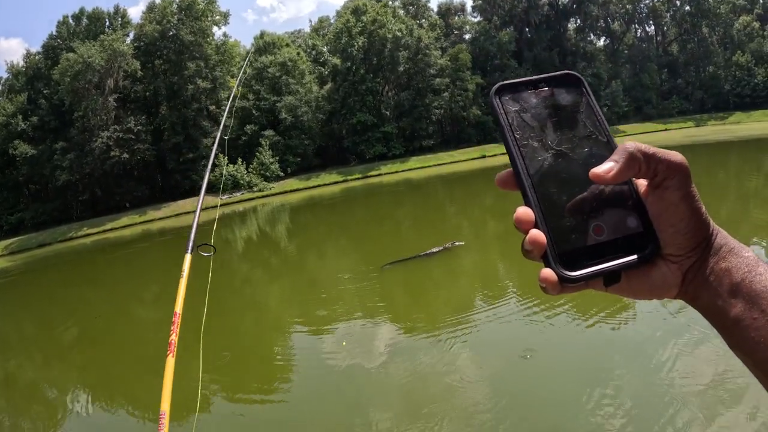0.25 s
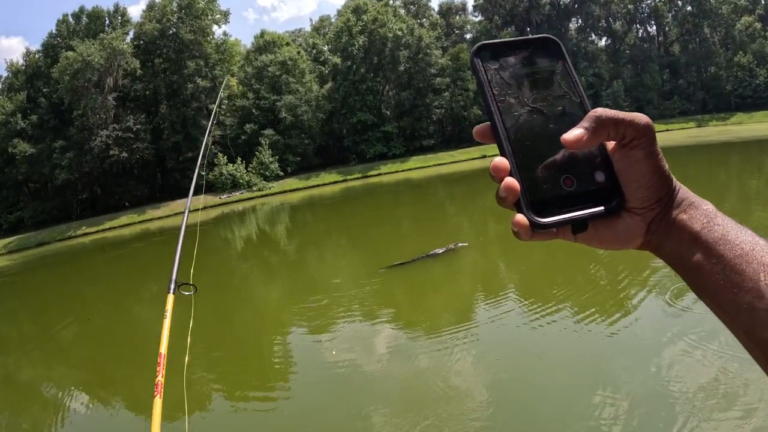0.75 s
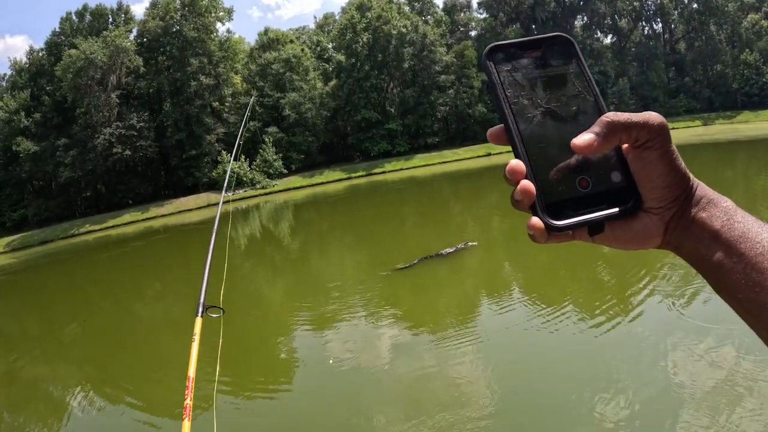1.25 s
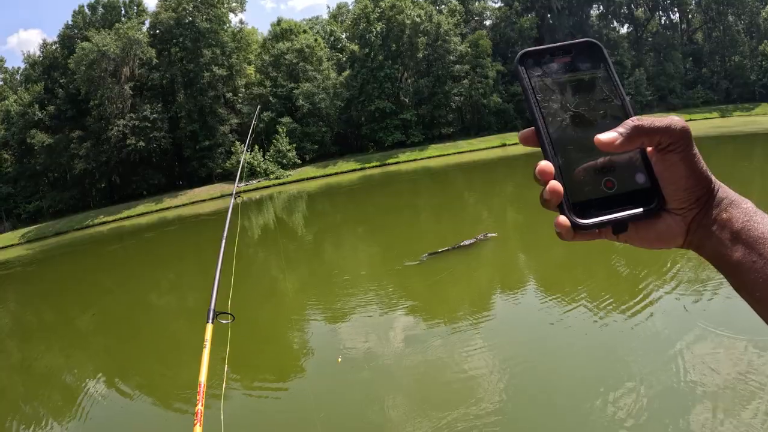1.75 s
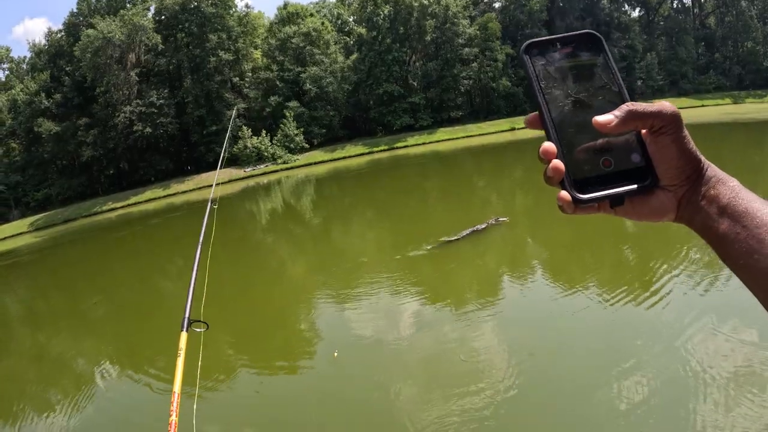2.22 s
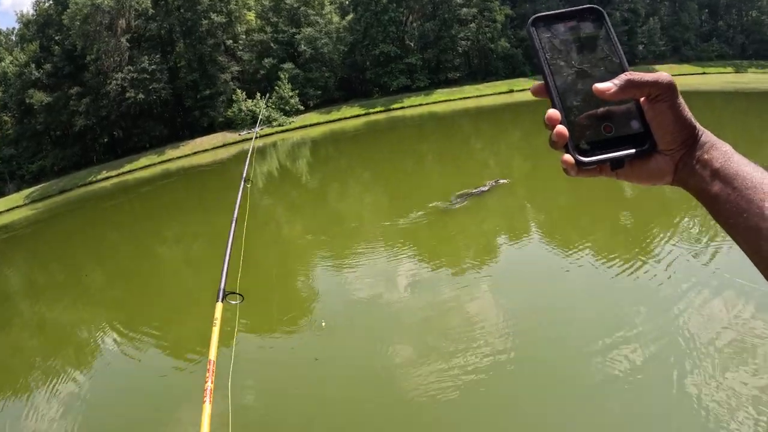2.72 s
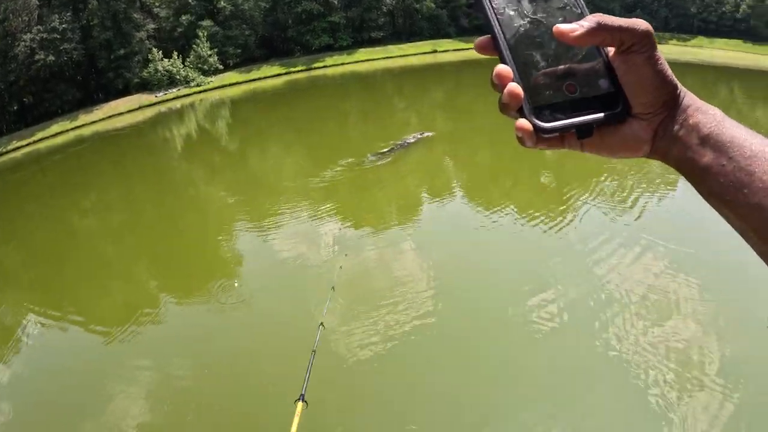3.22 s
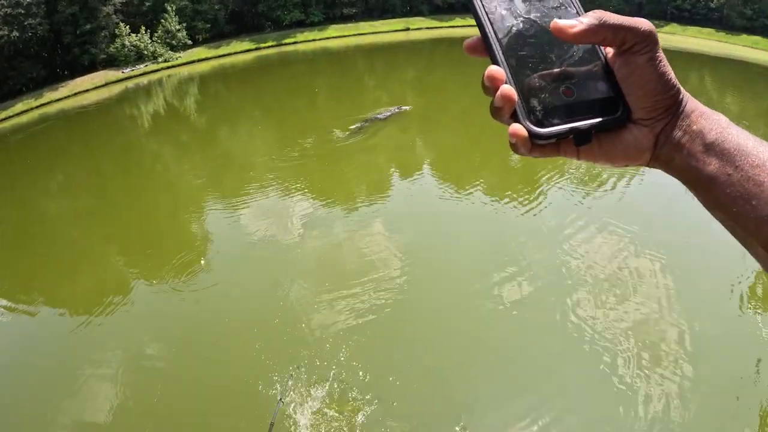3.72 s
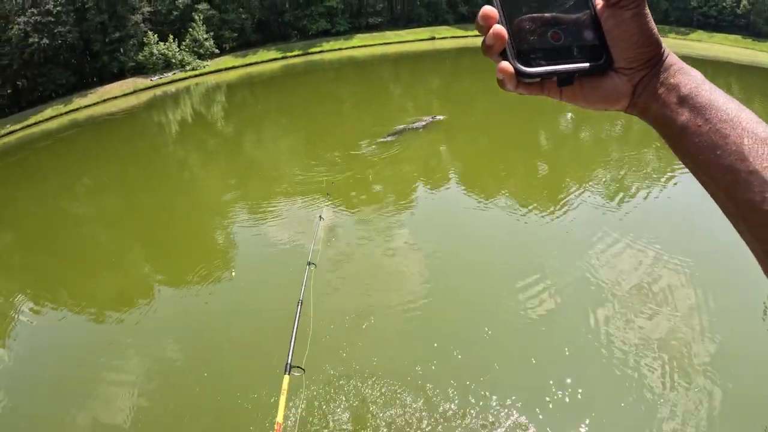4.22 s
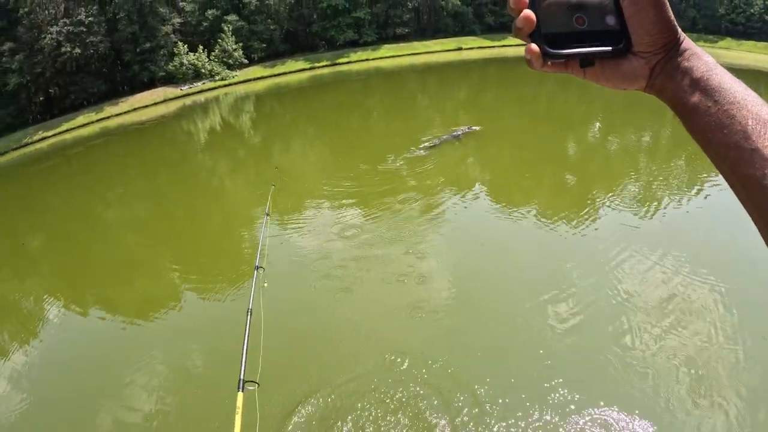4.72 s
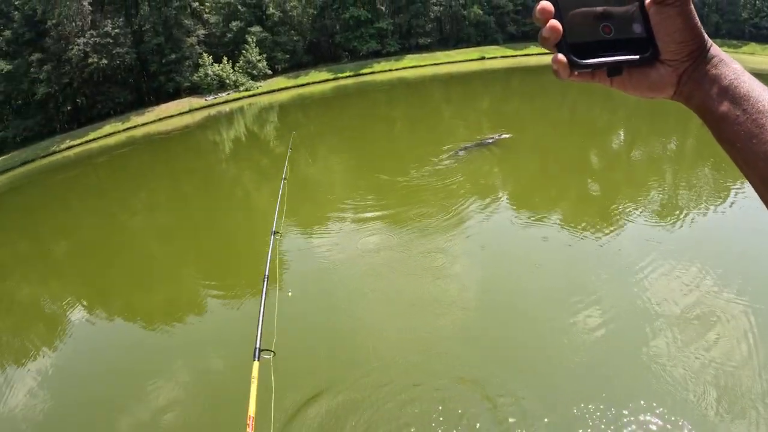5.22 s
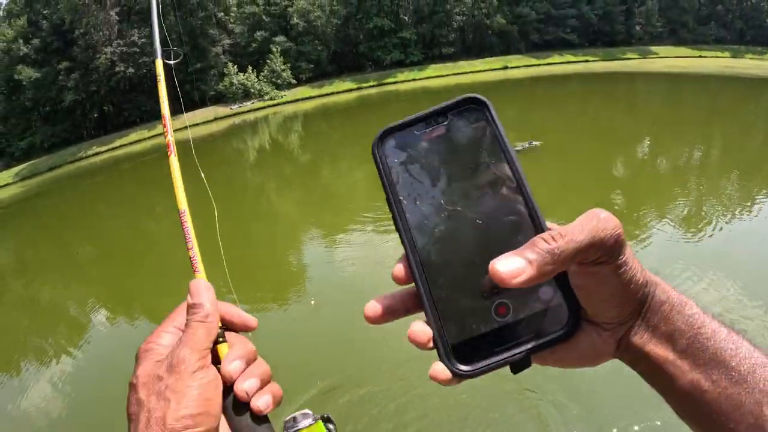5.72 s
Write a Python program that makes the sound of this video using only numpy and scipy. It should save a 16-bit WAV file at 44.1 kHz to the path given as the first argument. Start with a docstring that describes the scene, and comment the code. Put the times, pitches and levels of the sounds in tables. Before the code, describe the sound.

A roughly six-second outdoor scene at a still pond. A soft, steady low rumble, faint distant rush and wide leafy hiss run throughout. From about 0.95 to 1.3 s, a person close to the microphone makes a few wet, unvoiced smacks, the last one sharpest. After a gap, a stronger series follows at about 2.0, 2.2, 2.35, 2.5, 2.65 and 2.95 s: tiny sticky crackles, bright snaps and short hollow pops that drop in pitch. At 3.48 s a rod tip slaps the water, with a low plop and bright bubbles; a second stroke follows around 3.75 s, with fizzing spray and gurgling. Drops tick and patter until about 4.5 s, thinning into fading fizz. The end is quiet, with a faint wavering motor hum strongest near 5.2 s and barely audible thin insect tones. Reflections are short and slight.

```python
"""Pond bank: wet smacks and a splash

On the bank of a still pond someone makes wet, unvoiced smacking clicks close to the microphone, as if to
lure an animal: noisy ruptures ring in a slit and in a growing cavity. Then a rod tip and its line thrash
the water: filtered noise slaps, gliding sine bubbles, and grains of spray that patter back.
Coloured noise makes the low rumble, a distant rush and the hiss of trees; wavering sines make a faint
motor hum, and narrow noise bands make far insects."""
import sys
import numpy as np
from scipy import signal
from scipy.fft import rfft, irfft
from scipy.io import wavfile
from scipy.ndimage import uniform_filter1d

SR = 44100
rng = np.random.default_rng(int(sys.argv[2]) if len(sys.argv) > 2 else 0)


def dump_mix(stems):
    """Bounce the given channels to the path in sys.argv[1] as a 16-bit WAV at rate SR."""
    frames = np.atleast_2d(stems).T  # one column per channel
    limited = np.clip(frames, -1, 1)  # hard clip at full scale
    pcm = np.round(limited * 32767).astype(np.int16)
    wavfile.write(sys.argv[1], SR, pcm)


N = 262944
TIME = np.arange(N) / SR
CUTOFF_HZ = 16400   # top of the audible band here


def from_db(db):
    """Decibels to gain."""
    return 10 ** (np.asarray(db) / 20)


def rms_one(x):
    """Scale to unit power."""
    return x / np.sqrt(np.mean(x ** 2) + 1e-20)


def gains(rows):
    """Each dB column of a time curve as a gain per sample."""
    s, *columns = np.transpose(rows)
    return [from_db(np.interp(TIME, s, column)) for column in columns]


def at_hz(points, hz):
    """Read a table along log frequency."""
    f, value = np.transpose(points)
    return np.interp(np.log(hz + 1e-3), np.log(f), value)


def add(track, s, sound):
    """Mix a short sound in at time s."""
    i = int(s * SR)
    track[i:i + len(sound)] += sound[:N - i]


def decay(t, t60):
    """Exponential fall of 60 dB in t60 seconds."""
    return np.exp(-np.log(1000) * t / t60)


def drift(rate, size=N):
    """Slow random wander around 0: normal knots, rate per second, joined by straight lines."""
    knots = rng.standard_normal(400)
    return np.interp(TIME[:size] * rate, np.arange(len(knots)), knots)


def coloured(x, spectrum, keep_power=True, size=8192):
    """Causal minimum-phase filter with the given spectrum, made by folding its cepstrum."""
    hz = np.arange(size // 2 + 1) * SR / size
    cepstrum = irfft(np.log(from_db(at_hz(spectrum, hz))))
    cepstrum[1:size // 2] *= 2
    cepstrum[size // 2 + 1:] = 0
    response = irfft(np.exp(rfft(cepstrum)))
    if keep_power:
        response = response / np.linalg.norm(response)
    return signal.fftconvolve(x, response)[:N]


def placed(pair, balance):
    """Shade left against right, band by band."""
    shaded = []
    for x, sign in zip(pair, (1, -1)):
        half_balance = [(hz, sign * db / 2) for hz, db in balance]
        shaded.append(coloured(x, half_balance, keep_power=False))
    return np.array(shaded)


def ping(hz, t60, octaves, onset_cycles, wobble=0):
    """A dying sine that glides as it rings; a bubble's pitch also wobbles as it changes shape."""
    t = np.arange(int(t60 * SR) + 2) / SR
    shape = np.interp(t * hz / 2, np.arange(64), rng.standard_normal(64))
    pitch = np.minimum(hz * 2 ** (octaves * t / t60 + wobble * shape), SR / 2)
    onset = 1 - np.exp(-t * hz / onset_cycles)
    return np.sin(2 * np.pi * np.cumsum(pitch) / SR) * from_db(-60 * t / t60) * onset


def grains(per_s, spread_db, size=N):
    """Random clicks of uneven strength and either polarity; unit power."""
    strength_db = spread_db * np.minimum(rng.exponential(1, size), 4)
    strength = from_db(strength_db) * rng.choice([-1, 1], size)
    return rms_one(strength * (rng.random(size) < per_s / SR))


# colour of the low rumble: pitch_hz, relative_db (per Hz)
RUMBLE_COLOUR = [(12, -12.5), (40, 2), (90, 0), (120, -4.5), (200, -7.5), (280, -14), (400, -25),
                 (1500, -64.5)]
# colour of the tree hiss: pitch_hz, relative_db (per Hz)
HISS_COLOUR = [(250, -8.5), (550, 4), (850, -7), (1150, 2), (1550, 6), (2200, -2.5), (3600, -1.5),
               (7400, -8.5), (8400, -22), (10300, -22.5), (13500, -45.5)]
# how alike the hiss is in left and right: pitch_hz, likeness (0 to 1)
HISS_LIKENESS = [(130, 0.1), (640, 0.43), (6800, 0.55)]
# loudness of the distant low rush: time_s, level_db
RUSH_LEVEL = [(0, -54), (1, -53), (1.6, -57), (4.8, -61)]
# colour of the rush: pitch_hz, relative_db (per Hz)
RUSH_TONE = [(150, -14), (280, 9.5), (600, 2), (800, -2), (1050, 2), (2000, -55.5)]
# stereo lean of the air, and of the smacks too: pitch_hz, left_minus_right_db
NEAR_BALANCE = [(250, 2.5), (700, 2.5), (1400, 7.5), (4400, 1), (8120, 1.5), (15000, 10)]


def outdoors(rumble_db=-43, rumble_width_db=-27.5, leaves_db=-53.5):
    """Coloured noise: rumble nearly common to both ears, a distant rush, and the wide hiss of the trees."""
    white = rng.standard_normal((5, N))
    rumble_mid, rumble_side = [coloured(w, RUMBLE_COLOUR) for w in white[:2]]
    rumble = from_db(rumble_db) * (rumble_mid + from_db(rumble_width_db) * rumble_side * [[1], [-1]])
    alike = np.clip(at_hz(HISS_LIKENESS, np.arange(N // 2 + 1) * SR / N), -1, 1)
    parts = []
    for w, sign in zip(white[2:4], (1, -1)):
        share = np.sqrt((1 + sign * alike) / 2)   # shared and opposed power add up to one
        parts.append(irfft(rfft(coloured(w, HISS_COLOUR)) * share, N))
    mid, side = parts
    hiss = from_db(leaves_db) * (mid + side * [[1], [-1]])
    rush = gains(RUSH_LEVEL)[0] * coloured(white[4], RUSH_TONE)
    return rumble + placed(hiss + rush, NEAR_BALANCE)


# loudness of the two motor lines before flutter: time_s, low_line_db, high_line_db
HUM_LEVELS = [(0, -56.5, -57), (3.6, -52.5, -56.5), (4.6, -50.5, -50.5), (5.2, -45, -50.5),
              (5.96, -52.5, -56.5)]


def motor(low_hz=99, high_hz=178, flutter_db=3.0, wander=.05):
    """Two lines of a far engine, wavering in pitch and level."""
    hum = np.zeros(N)
    for gain, hz in zip(gains(HUM_LEVELS), (low_hz, high_hz)):
        level = np.sqrt(2) * gain * from_db(flutter_db * drift(9))
        pitch = hz * (1 + wander * drift(12))
        hum += level * np.sin(2 * np.pi * np.cumsum(pitch) / SR)
    return hum


# insect choruses in the trees: middle_s, length_s, pitch_hz, level_db
CHORUSES = [(2.4, 2.0, 3480, -69), (5.2, 2.2, 4310, -71), (5.4, 2.2, 5510, -70)]


def insects(sharpness=45):
    """Far choruses swell and fade, each a narrow resonance fed with noise."""
    chorus = np.zeros(N)
    for s, length, hz, db in CHORUSES:
        rise_and_fade = np.exp(-(2 * (TIME - s) / length) ** 4)
        rasp = signal.lfilter(*signal.iirpeak(hz, sharpness, fs=SR), rng.standard_normal(N))
        chorus += from_db(db) * rise_and_fade * rms_one(rasp)
    return chorus


def bank(x, echo_db, t60):
    """Ground and grass scatter a short, faint tail of decaying noise, different on each side."""
    t = np.arange(8192) / SR
    tail = rng.standard_normal((2, len(t))) * decay(t, t60) * (t > .004)
    tail /= np.linalg.norm(tail, axis=1, keepdims=True)
    return x + from_db(echo_db) * signal.fftconvolve(x, tail, axes=1)[:, :N]


POP_CYCLES = 4.36   # cycles in which a pop or plop falls by 60 dB
HOLLOW_START_HZ, HOLLOW_T60_S = 1190, .0042   # every smack opens from the same small cavity
HOLLOW_SWELL = .6   # power of the opening that raises the hollow ring
PEEL_ATTACK_S, PEEL_TAIL_S = .0006, .003
# wet seals peeling open: start_s, length_s, crackle_db, hollow_db, hollow_end_hz, slit_hz
SMACK_EVENTS = [(0.94, 0.015, -77, -41, 510, 7000), (0.956, 0.035, -39, -67, 594, 7300),
                (1.129, 0.031, -49.5, -50.5, 910, 5000), (1.29, 0.037, -35.5, -49, 1070, 6300),
                (2.027, 0.018, -39.5, -34.5, 970, 8660), (2.186, 0.026, -34, -32, 470, 8140),
                (2.339, 0.01, -30.5, -41.5, 600, 6030), (2.507, 0.027, -47.5, -67, 800, 4560),
                (2.642, 0.028, -36, -39, 510, 4770), (2.938, 0.026, -36, -41, 680, 5140)]
# the sharpest snaps of the seal: start_s, level_db
SEAL_SNAPS = [(0.9605, -21), (0.964, -20.5), (0.967, -23), (0.9875, -24), (1.297, -16), (1.3003, -16),
              (1.3064, -8.5), (1.3136, -9.5), (2.0307, -20), (2.198, -15), (2.207, -18), (2.3389, -12),
              (2.3415, -10), (2.6399, -18.5), (2.6446, -12), (2.6598, -22), (2.946, -14), (2.957, -8)]
# hollow pops as the tongue lets go: start_s, level_db, pitch_hz
TONGUE_POPS = [(1.076, -30.5, 486), (2.031, -12.5, 1110), (2.154, -25.5, 560), (2.2091, -14.5, 446),
               (2.348, -19, 564), (2.666, -15.5, 586), (2.957, -22, 587)]
# colour of the crackle: pitch_hz, relative_db (per Hz)
CRACKLE_COLOUR = [(120, -1), (500, 8), (1700, 11), (2450, 4.5), (3500, 8.5), (4700, 6.5), (6700, 8),
                  (8600, 0.5), (10200, 3.5), (13000, -25), (16000, -35)]


def smacks(snap_edge_db=-3, slit_q=3, slit_db=3, tightness=0.38, clump_db=1.5, mic_dip_hz=2500):
    """A seal peels in tiny ruptures that ring in the slit and a growing, sinking cavity; snaps and pops join."""
    crackle, rings = np.zeros(N), np.zeros(N)
    t = np.arange(4096) / SR
    for s, length, crackle_db, hollow_db, end_hz, slit_hz in SMACK_EVENTS:
        peel = (1 - np.exp(-t / PEEL_ATTACK_S)) * np.exp(-np.maximum(t - length, 0) / PEEL_TAIL_S)
        opening = np.minimum(t / length, 1)
        ruptures = grains(9000, 3.5, size=len(t)) * from_db(clump_db * drift(300, size=len(t)))
        # a tight seal rings in the slit rather than in the cavity
        slit = from_db(slit_db + tightness * (crackle_db - hollow_db))
        slit_ring = signal.lfilter(*signal.iirpeak(slit_hz, slit_q, fs=SR), ruptures)
        bright = rms_one(ruptures + slit * slit_ring)
        thinning = 1 - .5 * opening ** 2   # the crackle thins as the gap widens
        add(crackle, s, from_db(crackle_db) * peel * thinning * bright)
        # a gliding resonance: unwind the pitch, smooth, wind it back
        cavity_hz = HOLLOW_START_HZ * (end_hz / HOLLOW_START_HZ) ** opening
        turn = np.exp(2j * np.pi * np.cumsum(cavity_hz) / SR)
        keep = decay(1 / SR, HOLLOW_T60_S)
        cavity_ring = np.real(turn * signal.lfilter([1], [1, -keep], ruptures / turn))
        hollow = cavity_ring * peel * opening ** HOLLOW_SWELL
        hollow_rms = np.sqrt(np.sum(hollow ** 2) / (length * SR))
        add(rings, s, from_db(hollow_db) * hollow / hollow_rms)
    for s, db in SEAL_SNAPS:
        # a snap rings at or below the slit pitch of the nearest smack
        slit_hz = min(SMACK_EVENTS, key=lambda row: abs(row[0] - s))[-1]
        add(rings, s, from_db(db) * ping(slit_hz * rng.uniform(0.78, 1), .003, 0, 0.079))
        add(crackle, s, from_db([db + snap_edge_db]))   # a one-sample edge
    for s, db, hz in TONGUE_POPS:
        # each pop sinks about an octave as the cavity grows
        add(rings, s, from_db(db) * ping(hz, POP_CYCLES / hz, -1.05, 0.14))
    # a dip in the microphone's response near 2.5 kHz
    rings = signal.lfilter(*signal.iirnotch(mic_dip_hz, 2, fs=SR), rings)
    ring_band = signal.butter(2, [190, 11000], "band", fs=SR, output="sos")
    sound = coloured(crackle, CRACKLE_COLOUR) + signal.sosfilt(ring_band, rings)
    return placed([sound, sound], NEAR_BALANCE)


def swell(since, attack_s, hold_s, fade_db_per_s):
    """Attack, then a steady dB fade once hold_s has passed since the event."""
    return np.clip(since / attack_s, 0, 1) * from_db(-fade_db_per_s * np.maximum(since - hold_s, 0))


SPRAY_ATTACK_S, SPRAY_HOLD_S, SPRAY_FADE_DB_PER_S = 0.0058, 0.052, 69
FOAM_DB, FOAM_FADE_DB_PER_S = -9.5, 19   # foam fizzes on, below the spray
# the trough closes this long after the stroke
COLLAPSE_S, CHURN_ATTACK_S, CHURN_FADE_DB_PER_S = 0.04, 0.015, 216
# thrown drops come down again and stir the surface a little
FLIGHT_S, FLIGHT_SPREAD_S, FALL_CHURN_DB = 0.28, 0.2, -10.5
# strokes of the rod through the water, levels before the layer mix:
# start_s, spray_db, churn_db, falling_drops_db, churn_hold_s
ROD_STROKES = [(3.481, -39, -33, -55, 0.022), (3.753, -38, -40.5, -42, 0.075)]


def stirred_water():
    """Spray and churn strength: strokes throw spray, troughs collapse, drops fall back and foam lingers."""
    spray, churn = [], []
    for s, spray_db, churn_db, fall_db, hold_s in ROD_STROKES:
        since = TIME - s
        thrown = from_db(spray_db) * swell(since, SPRAY_ATTACK_S, SPRAY_HOLD_S, SPRAY_FADE_DB_PER_S)
        foam = from_db(spray_db + FOAM_DB) * swell(since, SPRAY_ATTACK_S, SPRAY_HOLD_S, FOAM_FADE_DB_PER_S)
        landing = np.exp(-((since - FLIGHT_S) / FLIGHT_SPREAD_S) ** 2)
        falling = from_db(fall_db) * landing * (since > 0)
        closing = swell(since - COLLAPSE_S, CHURN_ATTACK_S, hold_s, CHURN_FADE_DB_PER_S)
        spray += [thrown, foam, falling]
        churn += [from_db(churn_db) * closing, from_db(FALL_CHURN_DB) * falling]
    return np.linalg.norm(spray, axis=0), np.linalg.norm(churn, axis=0)


WOBBLE_OCTAVES = .045   # spread of a bubble's pitch wobble


def bubble_cloud(low_hz, high_hz, cycles, spread_db, count, settle_s=1.7, scatter_db=1):
    """Many small bubbles at random moments, places and pitches, evened to about unit power."""
    out = np.zeros((2, N))
    for when, size, strength, place, rise in rng.random((count, 5)):
        start_s = ROD_STROKES[0][0] + when * settle_s
        hz = low_hz * (high_hz / low_hz) ** size
        ring = ping(hz, cycles / hz, rise ** 4, 0.58, WOBBLE_OCTAVES)
        sound = from_db(spread_db * strength ** 2) * ring
        for channel, sign in zip(out, (1, -1)):
            add(channel, start_s, sound * from_db(sign * scatter_db * (place - 0.5)))
    power = uniform_filter1d(np.mean(out ** 2, axis=0), size=1764)   # over 40 ms
    return out / np.sqrt(np.abs(power) + 1e-6)


# ring of a full-scale bubble; one this much fainter rings twice as many cycles
BUBBLE_CYCLES, FAINT_LASTS_DB = 14.4, 17
CONTACT_S, SLAP_T60_S, TICK_T60_S = 0.00045, 0.036, 0.0097   # contact builds up, then a short wash
# rod, line and falling water slap the surface, levels before colouring: start_s, level_db, dull_above_hz
SURFACE_SLAPS = [(3.48, -28, 12200), (3.4938, -30.5, 9000), (3.518, -27, 2290), (3.534, -33, 2500),
                 (3.546, -25, 7040), (3.594, -18.5, 1500), (3.7635, -42, 12100), (3.828, -30, 6000),
                 (3.8703, -24, 3300), (3.885, -25.5, 3300), (3.981, -31, 2000), (3.9864, -25.5, 14100),
                 (4.021, -30, 9000), (4.218, -32, 5000), (4.339, -33.5, 8050), (4.348, -33.5, 7240)]
# single drops strike with a sharp tick, levels before colouring: start_s, level_db
DROP_TICKS = [(3.44, -38.5), (3.504, -38), (3.625, -29.5), (3.7235, -32), (3.7628, -31), (3.7665, -24.5),
              (3.798, -26), (3.8278, -16), (3.8763, -19), (3.9853, -18.5), (4.015, -25.5), (4.097, -24.5),
              (4.2477, -27.5), (4.4835, -38)]
# the loudest trapped air bubbles: start_s, level_db, pitch_hz, glide_octaves_per_s
AIR_BUBBLES = [(3.493, -19.5, 2300, 90), (3.517, -25.5, 1034, 20), (3.5495, -11, 2080, 80),
               (3.553, -28, 625, 1), (3.6, -12.5, 976, 12), (3.687, -34, 1880, 131), (3.7172, -29, 3100, 3),
               (3.754, -32, 1034, -7), (3.764, -26, 2160, -15), (3.82, -30.5, 330, 16),
               (3.833, -30, 1360, 85), (3.87, -22, 1220, 71), (3.884, -25, 1224, 11),
               (3.888, -33, 600, -5.5), (3.924, -26, 1074, 43), (3.987, -22.5, 2180, -30),
               (4.015, -27.5, 1058, -17.5), (4.061, -39, 1600, 5), (4.064, -34, 2730, 28),
               (4.085, -30, 4460, 20), (4.089, -31, 1740, 36), (4.102, -32.5, 570, 3.5),
               (4.141, -33, 2950, 50), (4.221, -33, 965, 1.5), (4.233, -39, 2800, 40), (4.24, -32, 980, 5),
               (4.279, -43, 2400, 50), (4.317, -29, 4830, 90), (4.333, -42, 1580, 51),
               (4.4285, -21.5, 4420, 332), (4.6292, -37, 2600, 4)]
# low plops as the trough closes: start_s, level_db, pitch_hz
TROUGH_PLOPS = [(3.5456, -12, 301), (3.865, -19.5, 463)]
# colour of slaps, ticks and fizz: pitch_hz, relative_db (per Hz)
SPRAY_COLOUR = [(250, -21), (1150, 2.5), (2400, 3.5), (4200, 3.5), (5600, 8), (8600, -5), (10700, -2.5),
                (13000, -8.5), (16000, -27)]
# stereo lean of the splash: pitch_hz, left_minus_right_db
SPLASH_BALANCE = [(2500, -0.5), (15000, 2.5)]


def splash(fizz_db=-8.0, droplet_db=-4, width_db=-9):
    """Slaps burst into fizz and trap air; the trough gurgles shut; thrown drops tick and ring as they land."""
    spray, churn = stirred_water()
    bursts, bubbles = np.zeros((2, N)), np.zeros(N)
    t = np.arange(4096) / SR
    wash = np.minimum(t / CONTACT_S, 1) * decay(t, SLAP_T60_S)
    crack = decay(t, TICK_T60_S)
    for burst in bursts:
        for s, db, dull_hz in SURFACE_SLAPS:
            dull = signal.butter(2, min(dull_hz, CUTOFF_HZ), fs=SR)
            slap = signal.lfilter(*dull, wash * rng.standard_normal(len(t)))
            add(burst, s, from_db(db) * slap)
        for s, db in DROP_TICKS:
            add(burst, s, from_db(db) * crack * rng.choice([-1, 1], len(t)))
    for s, db, hz, glide in AIR_BUBBLES:
        t60 = BUBBLE_CYCLES * 2 ** (-db / FAINT_LASTS_DB) / hz
        add(bubbles, s, from_db(db) * ping(hz, t60, glide * t60, 1, WOBBLE_OCTAVES))
    for s, db, hz in TROUGH_PLOPS:
        add(bubbles, s, from_db(db) * ping(hz, POP_CYCLES / hz, 0, 0.38))
    layers = []
    for burst in bursts:
        spray_grains = from_db(fizz_db) * spray * grains(6000, 4)
        layers.append(coloured(burst + spray_grains, SPRAY_COLOUR))
    mid, side = layers   # one burst track is shared, the other opposed left to right
    fizz = mid + from_db(width_db) * side * [[1], [-1]]
    droplets = from_db(droplet_db) * spray * bubble_cloud(1550, 10430, 30, 21.6, count=2100)
    gurgle = churn * bubble_cloud(370, 2800, 22, 14, count=700)
    return placed(fizz + droplets + gurgle + bubbles, SPLASH_BALANCE)


def scene():
    """Smacks and splashes over the steady outdoor bed."""
    near_smacks = bank(smacks(), echo_db=-16.5, t60=0.059)
    water = bank(splash(), echo_db=-12, t60=0.078)
    return near_smacks + water + outdoors() + motor() + insects()


def record(dry, roll_off_hz=13800):
    """The microphone loses the highest treble; the top is cut steeply."""
    soft = signal.sosfilt(signal.butter(4, roll_off_hz, fs=SR, output="sos"), dry)
    return signal.sosfilt(signal.cheby2(16, 70, CUTOFF_HZ, fs=SR, output="sos"), soft)


dry = scene()
out = record(dry)
dump_mix(out)
```